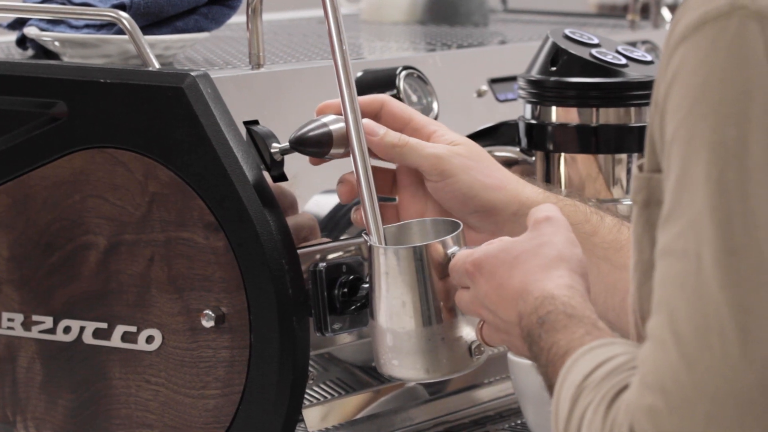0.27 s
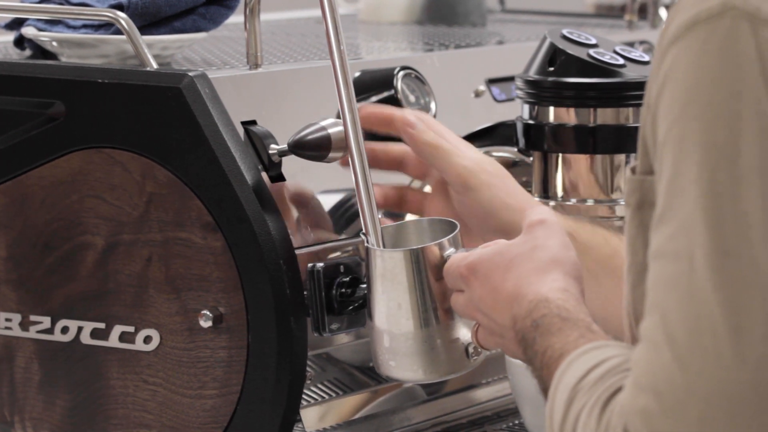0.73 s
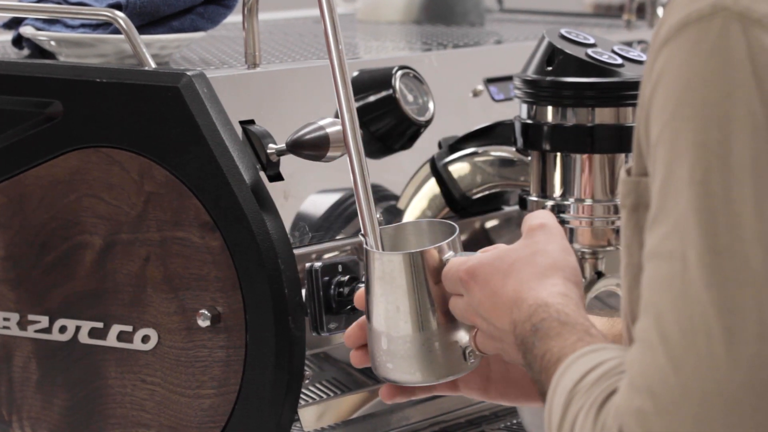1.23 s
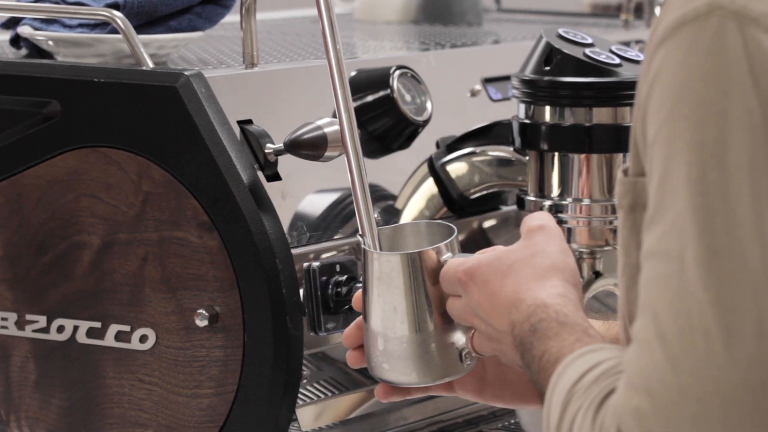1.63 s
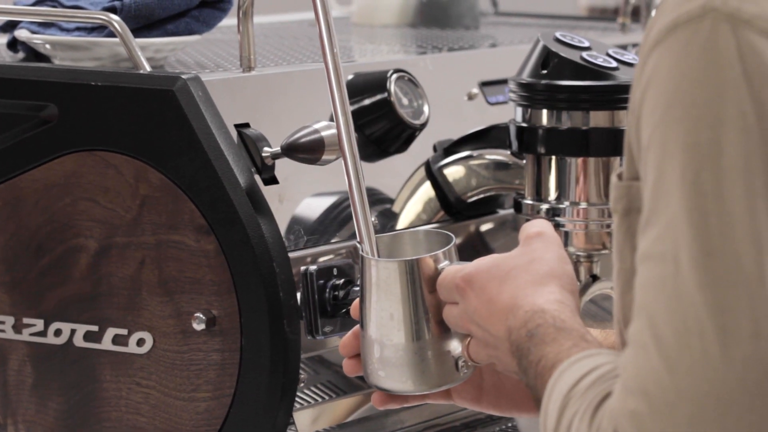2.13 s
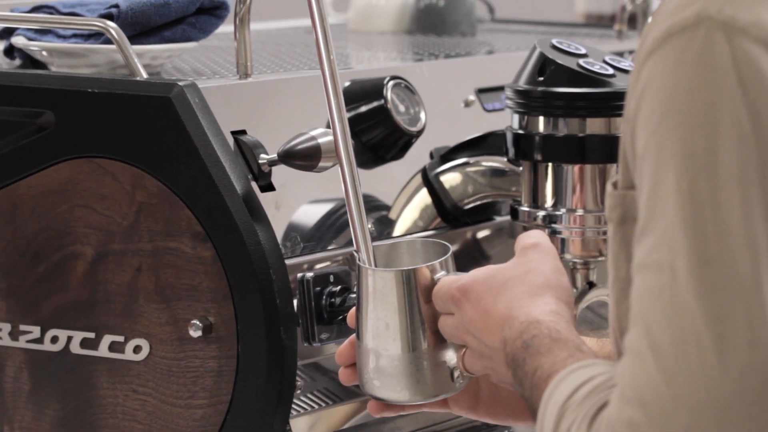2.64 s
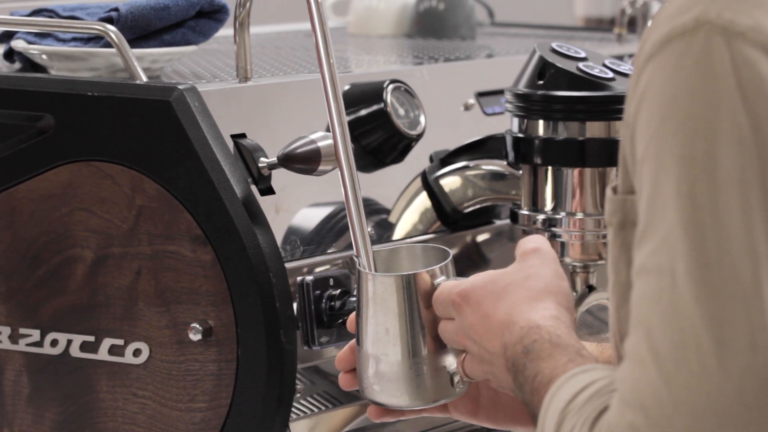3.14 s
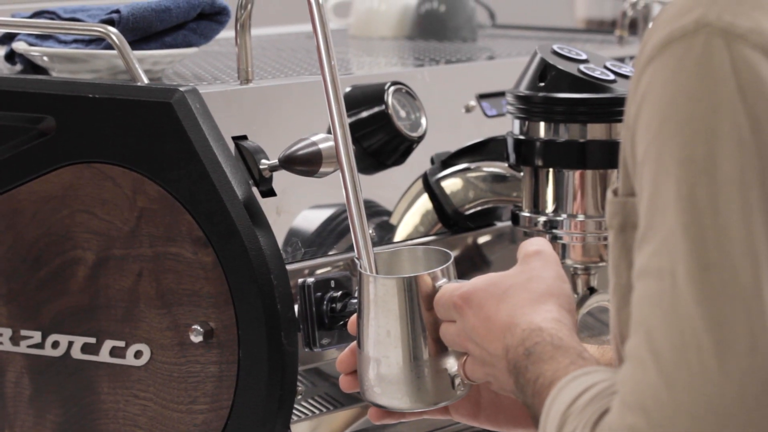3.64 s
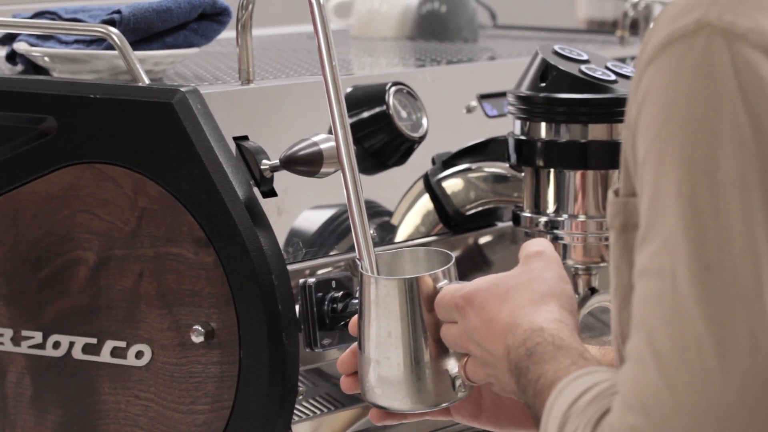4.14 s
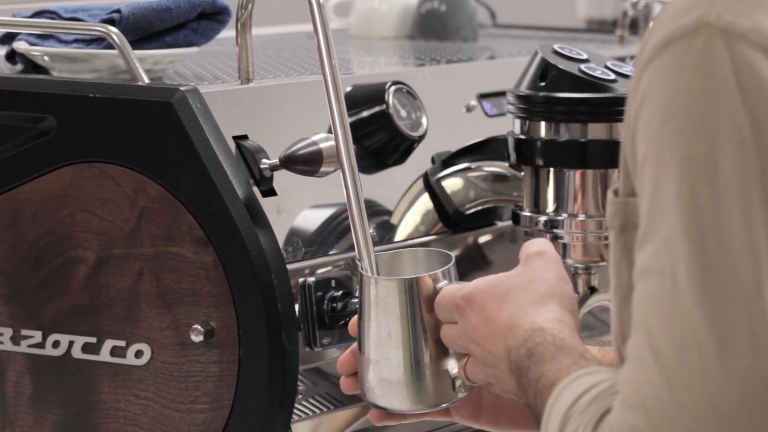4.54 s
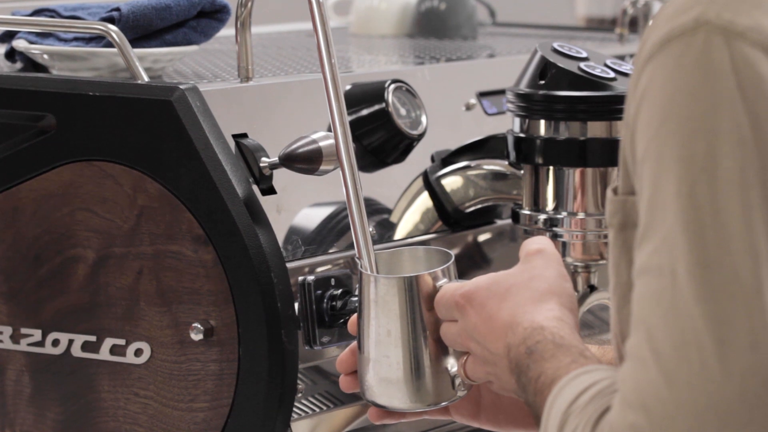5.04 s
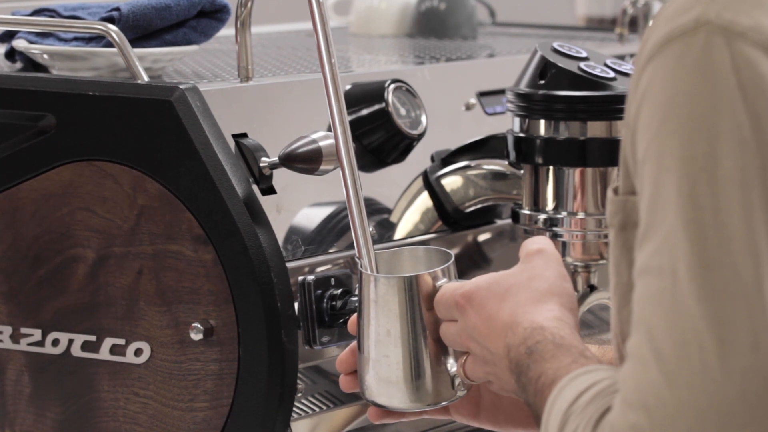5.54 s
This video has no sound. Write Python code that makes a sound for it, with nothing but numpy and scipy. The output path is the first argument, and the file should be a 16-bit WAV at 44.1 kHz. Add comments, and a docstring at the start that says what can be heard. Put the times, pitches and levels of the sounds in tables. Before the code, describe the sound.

Close up in a quiet room, milk is frothed in a metal jug. The steam starts with a harsh, ringing howl, then drops to a fizzing hiss over softly churning milk. A few bubbles pop and two tiny squeaks slip out. From about halfway, quick crackling slurps of air come one after another as the hiss gradually becomes muffled by foam.

```python
"""A quiet room, where a steam wand heats cold milk in a steel pitcher.
At first the tip is deep and the collapsing steam makes the pitcher screech. The pitcher is lowered:
the jet settles to a gurgling hiss with stray bubbles, then tears air in at the surface in short
crackling sips and two squeaks. The sips build a foam that slowly smothers the hiss."""
import sys
import numpy as np
from scipy import signal
from scipy.fft import rfft, irfft, next_fast_len
from scipy.io import wavfile

SR = 44100
rng = np.random.default_rng(int(sys.argv[2]) if len(sys.argv) > 2 else 0)


def output_pcm(signal):
    """Save a mono or channel-first signal as 16-bit PCM at the path in sys.argv[1].

    Samples are clipped to [-1, 1] before scaling.
    """
    pcm = np.clip(np.atleast_2d(signal).T, -1, 1) * 32767
    wavfile.write(sys.argv[1], SR, np.round(pcm).astype(np.int16))


N = 255339
TIME = np.arange(N) / SR
LOWER_S = .81   # the pitcher drops and the screech dies away
SINCE_LOWERED = np.maximum(TIME - LOWER_S, 0)
CLOSE_S = .0026   # decay time of the air flow as the milk closes over a gap


def from_db(db):
    """Decibels to gain."""
    return 10 ** (np.asarray(db) / 20)


def rms_one(x):
    """Scale to unit power."""
    return x / np.sqrt(np.mean(x ** 2) + 1e-20)


def in_time(rows):
    """Automation curves: each column after the time, at every sample."""
    times, *columns = np.transpose(rows)
    return [np.interp(TIME, times, column) for column in columns]


def drift(rate):
    """Smooth random modulation of unit power, rolling off above rate [Hz]."""
    pole = np.exp(-40 * np.pi * rate / SR)   # runs at SR / 20
    slow = signal.lfilter([1], [1, -2 * pole, pole * pole], rng.standard_normal(N // 20 + 2002))[2000:]
    return np.interp(np.arange(N) / 20, np.arange(len(slow)), rms_one(slow))


def coloured(x, spectrum):
    """Minimum-phase EQ with the given curve; white input keeps its power."""
    size = 2 * next_fast_len(N // 2 + SR // 10)
    hz, db = np.transpose(spectrum)
    bin_hz = np.arange(size // 2 + 1) * SR / size
    gain = rms_one(from_db(np.interp(np.log(bin_hz + 1), np.log(hz), db)))
    cepstrum = irfft(np.log(gain))[:size // 2]
    cepstrum[1:] *= 2
    return irfft(rfft(x, size) * np.exp(rfft(cepstrum, size)))[:N]


def resonate(x, modes):
    """Parallel resonances of alternating sign; unit power."""
    out = 0
    for k, (hz, width, db) in enumerate(modes):
        r = np.exp(-np.pi * width / SR)
        ring = signal.lfilter([1, 0, -1], [1, -2 * r * np.cos(2 * np.pi * hz / SR), r * r], x)
        out += (-1) ** k * from_db(db) * (1 - r * r) * ring
    return rms_one(out)


def band(x, low_hz, high_hz):
    """Band-pass with steep skirts."""
    return signal.sosfilt(signal.butter(4, [low_hz, high_hz], "band", fs=SR, output="sos"), x)


def collapses(per_s, spread_db=2.5):
    """Random clicks of uneven size, one for each collapsing bubble; unit power."""
    sizes = from_db(spread_db * np.minimum(rng.exponential(1, N), 4)) * rng.choice([-1, 1], N)
    return rms_one(sizes * (rng.random(N) < per_s / SR))


def flutter(rate, depth_db):
    """Uneven surging of the flow; unit power."""
    return rms_one(from_db(depth_db * drift(rate)))


def cloud(hz, width):
    """A cloud of like bubbles ringing within about width [Hz] of a moving pitch; unit power."""
    phase = 2 * np.pi * np.cumsum(hz) / SR
    return rms_one(drift(width) * np.cos(phase) + drift(width) * np.sin(phase))


def swarms(low_hz, high_hz, count):
    """Swarms of like bubbles flare up briefly, each around a pitch of its own; unit power."""
    return rms_one(sum(cloud(hz * (1 + .03 * drift(rate=4)), width=230) * flutter(rate=26, depth_db=5)
                       for hz in np.geomspace(low_hz, high_hz, count)))


def whirl(db, loss_db_per_s, attack_s=.28):
    """Fader for a layer that sets in as the pitcher drops, then sinks steadily under the foam."""
    age = TIME - LOWER_S
    return np.clip(age / attack_s + .5, 0, 1) * from_db(db - loss_db_per_s * age)


# EQ of the room's rumble: (frequency [Hz], relative level [dB])
ROOM_EQ = [(36, -4), (50, -16), (170, -0.5), (400, -4.5), (4000, -53)]

def room_tone():
    """A faint bed of low noise under the whole scene."""
    return from_db(-66.5) * band(coloured(rng.standard_normal(N), ROOM_EQ), low_hz=30, high_hz=7966)


# pitcher resonances, tip deep and slightly raised: (frequency [Hz], width [Hz], relative level [dB])
DEEP_MODES = [(986, 27, 1.5), (1246, 35, -4), (1550, 240, -11.5), (3100, 34, -19), (3920, 85, -8)]
RAISED_MODES = [(993, 19, -12), (1797, 28, 6.5), (1970, 64, 2), (2147, 195, -1), (7500, 210, -6),
                (8170, 180, -6.5)]
# squeal of the nozzle: (time [s], pitch [Hz])
SQUEAL_GLIDE = [(.16, 3093), (.22, 3640), (.32, 3930), (.5, 3676), (.81, 3560), (.89, 3020)]
# howl of the steam pocket: (time [s], pitch [Hz], relative level [dB])
HOWL_GLIDE = [(.02, 1400, -15), (.065, 1230, 0.5), (.14, 1537, -21), (.28, 1780, -10.5), (.48, 1813, -10.5),
              (.8, 1822, -5)]
# broad roar of the collapsing steam: (frequency [Hz], relative level [dB])
ROAR_EQ = [(250, -44.5), (420, -16.5), (750, -14), (1050, -4), (1750, 7), (2550, -1), (3800, 4.5),
           (5000, 2), (6300, -5.5), (8300, 1.5), (15700, -15.5)]

def screech(rise_s=.85, release_db_per_s=50):
    """Steam implodes in cold milk and rings the pitcher; a howl and a squeal glide through the roar."""
    deep = np.clip(1 - TIME / rise_s, 0, 1)
    release = from_db(-release_db_per_s * SINCE_LOWERED)
    implosions = collapses(per_s=9000) * flutter(rate=260, depth_db=2)
    (squeal_hz,) = in_time(SQUEAL_GLIDE)
    howl_hz, howl_db = in_time(HOWL_GLIDE)
    squeal = cloud(squeal_hz * (1 + .03 * drift(rate=25)), width=130)
    squeal *= from_db(-5.5) * (squeal_hz / squeal_hz.max()) ** 2   # higher is louder
    howl = from_db(howl_db) * cloud(howl_hz * (1 + .02 * drift(rate=60)), width=60)
    swell = from_db(-12) * np.exp(-((TIME - .41) / .12) ** 2)   # the pitcher's top ring comes and goes
    top_ring = swell * cloud(5130 * (1 + .02 * drift(rate=25)), width=140)
    voices = (squeal + release ** 2 * howl + top_ring) * flutter(rate=30, depth_db=2.5)
    ringing = np.sqrt(deep) * resonate(implosions, DEEP_MODES)
    ringing += np.sqrt(1 - deep) * resonate(implosions, RAISED_MODES)
    ringing = release * band(ringing, low_hz=876, high_hz=10400)   # the rings die sooner than the roar
    roar = coloured(collapses(per_s=9000) * flutter(rate=34, depth_db=1.3), ROAR_EQ)
    fader = from_db(-21.5 + 3.5 * deep ** 2) * release
    return fader * (from_db(-3) * ringing + from_db(-4) * roar + voices)


# modes of the milk column: (multiple of the lowest mode [ratio], relative level [dB])
COLUMN_MODES = [(1, -8.5), (1.73, -7.5), (2.5, -8), (3.25, -11.5), (4.1, -13.5), (5.0, -15.5)]
# body of the whirling milk: (frequency [Hz], relative level [dB])
CHURN_EQ = [(150, -28.5), (550, -24.5), (720, -14.5), (900, -17), (1050, -2), (1250, 1.5), (1550, -0.5),
            (2100, -6.5), (3500, -12.5), (15000, -36)]

def churn(airflow, column_hz=1022.5, sag_octaves_per_s=.39):
    """The whirling milk gurgles in the wavering modes of its column, over a wash of loose bubbles."""
    hz = column_hz * 2 ** (-sag_octaves_per_s * SINCE_LOWERED)   # sinks as bubbles soften the milk
    waver = np.interp(TIME, [1.5, 2.1], [.07, .025])   # the whirl steadies
    column = 0
    for multiple, db in COLUMN_MODES:
        mode = cloud(multiple * hz * (1 + waver * drift(rate=12)), width=69)
        column += from_db(db) * mode * flutter(rate=51, depth_db=6.5)
    gurgle = from_db(-4) * rms_one(coloured(column, CHURN_EQ))
    wash = from_db(-5) * coloured(collapses(per_s=2000) * flutter(rate=100, depth_db=2), CHURN_EQ)
    # each gulp of air stirs the milk and rings as a large bubble a moment later
    gulp = signal.sosfilt(signal.butter(2, 18, fs=SR, output="sos"), airflow)
    glug = gulp * band(cloud(560 * (1 + .13 * drift(rate=12)), width=60), low_hz=400, high_hz=900)
    stirred = (1 + .83 * gulp) * (gurgle + wash)
    return whirl(db=-37, loss_db_per_s=.33) * stirred + whirl(db=-22, loss_db_per_s=3) * glug


# ring of the hollow around the jet: (time [s], pitch [Hz])
HOLLOW_GLIDE = [(1.07, 1297), (1.52, 1565), (1.68, 1282), (1.85, 1467), (1.92, 1188), (2.28, 1246),
                (2.9, 1112), (2.97, 1378), (3.3, 1220), (3.75, 1156), (4.7, 1218), (5.7, 1375)]

def hollow(airflow, sip_gain=7.7):
    """The hollow that the jet digs in the milk rings at one wandering pitch, louder with each sip."""
    (hz,) = in_time(HOLLOW_GLIDE)
    ring = cloud(hz * (1 + .022 * drift(rate=20)), width=60) * flutter(rate=41, depth_db=3)
    return whirl(db=-40.5, loss_db_per_s=.39) * (1 + sip_gain * airflow) * ring


# bubble tones at the nozzle: (pitch [Hz], width [Hz], relative level [dB])
TIP_MODES = [(3128, 75, -1.7), (3538, 90, 0.48)]
# nozzle fizz, jet hiss through thin milk, and through foam: (frequency [Hz], relative level [dB])
FIZZ_EQ = [(1500, -22), (2100, -6.5), (2800, 1.5), (3600, 3), (4500, -8.5), (5500, -12), (15000, -22)]
THIN_HISS_EQ = [(3000, -66), (4500, 2.5), (5400, -5), (6900, 7.5), (9800, 6), (11500, 0.5), (15700, -4)]
FOAMED_HISS_EQ = [(1000, -19), (1900, 8), (2900, 2.5), (4300, 9), (5200, 5), (7000, 8.5), (9000, -3),
                  (11500, -8), (15700, -29)]

def steam_tip(surfaced_s=2.56, foam_s=4.15, rise_octaves_per_s=.031):
    """Small steam bubbles sing and fizz at the nozzle; the jet hisses above, duller as foam caps it."""
    shallow = np.interp(TIME, [2.17, surfaced_s], [.05, .7])   # the ring clears near the surface
    foam = 1 - np.exp(-(SINCE_LOWERED / foam_s) ** 3)
    rise = 2 ** (rise_octaves_per_s * (TIME - surfaced_s))   # pitch climbs as foam fills the pitcher
    waver = .00791 + .02475 * foam
    tones = sum(from_db(db) * cloud(hz * rise * (1 + waver * drift(rate=24.7)), width)
                for hz, width, db in TIP_MODES)
    ring = np.sqrt(shallow) * rms_one(tones) * flutter(rate=34, depth_db=2.5)
    fizz = collapses(per_s=1500, spread_db=4)
    fizz += 2 * (1 - foam) * swarms(low_hz=1801, high_hz=4644, count=11)
    jet = collapses(per_s=3500, spread_db=-.5) * flutter(rate=160, depth_db=2.5)
    jet += .89 * swarms(low_hz=4456, high_hz=9770, count=12)
    hiss = (1 - foam) * rms_one(coloured(jet, THIN_HISS_EQ))
    hiss += np.sqrt(foam) * coloured(collapses(per_s=10000), FOAMED_HISS_EQ)
    return (whirl(db=-23, loss_db_per_s=3.5) * ring
            + whirl(db=-34, loss_db_per_s=1.43) * rms_one(coloured(fizz, FIZZ_EQ))
            + whirl(db=-33, loss_db_per_s=2.61) * hiss)


# bubbles that stand out: (peak time [s], half-length [s], pitch [Hz], relative level [dB])
BUBBLES = [(0.929, 0.025, 1686, -26), (1.265, 0.02, 1930, -31), (1.682, 0.0065, 1236, -31),
           (2.5, 0.0066, 3570, -17), (2.54, 0.092, 3520, -31.5), (2.541, 0.026, 3660, -25.5),
           (2.643, 0.011, 3500, -27.5),  (3.596, .023, 1060, -31.5), (3.681, 0.025, 980, -37),
           (3.742, 0.034, 1118, -29.5), (3.847, 0.023, 943, -37), (4.056, 0.022, 303, -57.5),
           (4.319, 0.038, 652, -48), (4.694, .032, 599, -47), (5.293, 0.026, 237, -51.5),
           (5.463, .004, 1430, -31), (5.526, 0.037, 509, -54)]

def bubbles(waver=.0358, sag=.0791):
    """Larger bubbles swell, ring and fade, sinking a little in pitch as they grow."""
    out, jitter = np.zeros(N), drift(rate=120)
    for peak_s, half_s, hz, db in BUBBLES:
        near = np.abs(TIME - peak_s) < 2 * half_s
        age = (TIME[near] - peak_s) / half_s
        phase = 2 * np.pi * np.cumsum(hz * (1 - sag * age + waver * jitter[near])) / SR
        out[near] += from_db(db + 7.5) * np.exp(-3 * age ** 2) * np.sin(phase)
    return out * flutter(rate=140, depth_db=4.5)


# squeaking threads of air: (start [s], end [s], first pitch [Hz], last pitch [Hz], end level [dB])
SQUEAKS = [(1.650, 1.68, 8770, 5360, -25), (3.723, 3.761, 8150, 3280, -29)]

def squeaks():
    """Threads of air slip in with a rough squeak that falls as it swells."""
    out = 0
    for start, end, first_hz, last_hz, db in SQUEAKS:
        progress = np.clip((TIME - start) / (end - start), 0, 1)
        voice = cloud(first_hz + (last_hz - first_hz) * progress ** 2, width=1100)
        release = np.exp(-np.maximum(TIME - end, 0) / CLOSE_S)
        out += from_db(db) * progress * release * voice
    return out


# sips of air: (start [s], time open [s], crest level [dB])
SIPS = [(1.730, 0.0062, -24), (1.752, 0.0023, -24), (2.666, 0.005, -27), (2.687, 0.021, -20),
        (2.755, 0.013, -21.5), (2.857, 0.029, -20), (3.184, 0.028, -24.5), (3.373, .012, -22),
        (3.401, 0.019, -22), (3.425, 0.014, -20.5), (3.501, 0.027, -23.5), (3.537, 0.0093, -30),
        (3.577, .027, -21), (3.622, 0.081, -22.5), (3.722, 0.051, -23), (3.823, .03, -22),
        (3.869, 0.039, -26), (3.913, 0.04, -25), (3.987, 0.07, -22.5), (4.171, 0.021, -25.5),
        (4.215, 0.02, -31), (4.252, 0.017, -22.5), (4.463, .009, -28), (4.489, 0.045, -28),
        (4.568, 0.0086, -31.5), (4.606, 0.011, -23), (4.641, 0.012, -25), (4.664, 0.042, -20),
        (4.716, 0.011, -22), (4.765, 0.098, -21.5), (4.878, 0.032, -21.5), (4.952, .015, -26.5),
        (5.005, 0.015, -31.5), (5.033, 0.023, -23.5), (5.151, 0.03, -21), (5.209, 0.03, -28.5),
        (5.24, 0.09, -18), (5.336, 0.03, -28), (5.373, 0.0074, -28), (5.696, .012, -26.5)]

def sip_airflow(attack_s=.00099, swell_db_per_s=105, crest_share=.71):
    """Air flow as the tip breaks the surface: each sip rips open, swells to a crest and trails off."""
    airflow = np.zeros(N)
    for start, length, db in SIPS:
        age = TIME - start
        opening = np.clip(age / attack_s, 0, 1) * np.exp(-np.maximum(age - length, 0) / CLOSE_S)
        snap = 1 + .36 * np.exp(-np.maximum(age, 0) / CLOSE_S)   # a brief peak as each sip opens
        swell = from_db(db - swell_db_per_s * np.abs(age - crest_share * length))
        airflow = np.maximum(airflow, opening * snap * swell)
    return airflow


# crackle of the torn-in air: (frequency [Hz], relative level [dB])
SIP_EQ = [(60, -46), (240, -21), (700, -24), (1150, 6), (2400, -19.5), (3900, 1), (5000, -8.5),
          (6700, -2.5), (7500, 1.5), (10200, 0), (11500, -4.5), (13800, -10.5), (15400, -3)]

def sips(airflow):
    """Air tears into the milk as a dense crackle with swarms of tiny bubbles and a shrill whistle."""
    flow = airflow * flutter(rate=114, depth_db=2.5)
    crackle = collapses(per_s=5000, spread_db=2) + .46 * swarms(low_hz=7480, high_hz=14650, count=12)
    air = from_db(-1.05) * coloured(flow * crackle, SIP_EQ)
    shrill = cloud(8900 * (1 + .08 * drift(rate=44)), width=700)
    whistle = flow * band(shrill, low_hz=6750, high_hz=10300)
    narrow = np.interp(TIME, [2.7, 3.7], [.55, .1])   # the first narrow gaps whistle more than crackle
    return np.sqrt(1 - narrow) * air + np.sqrt(narrow) * whistle


def reverb(x, t60, wet_db):
    """Reflections add a diffuse tail that falls 60 dB in t60 [s]."""
    t = TIME[:SR // 2]
    tail = rng.standard_normal(len(t)) * from_db(-60 * t / t60)
    return x + from_db(wet_db) * signal.fftconvolve(x, tail / np.linalg.norm(tail))[:N]


def scene():
    """Wand and pitcher in the room, over its faint rumble; mono."""
    airflow = sip_airflow()
    wand = screech() + churn(airflow) + hollow(airflow) + steam_tip()
    wand = wand + squeaks() + sips(airflow) + bubbles()
    near = reverb(wand, t60=.073, wet_db=-10.5)   # off the steel machine
    return (room_tone() + reverb(near, t60=.25, wet_db=-18))[None]


def record(dry):
    """A steep high cut at 15.9 kHz."""
    return signal.sosfilt(signal.ellip(12, .1, 80, 15900, fs=SR, output="sos"), dry)


dry = scene()
out = record(dry)
output_pcm(out)
```